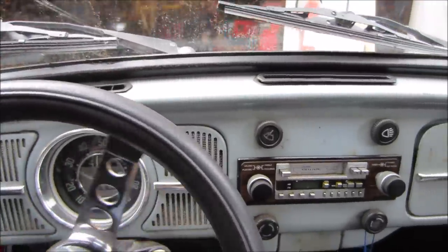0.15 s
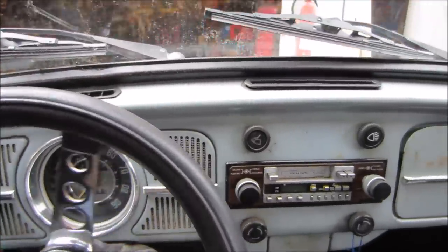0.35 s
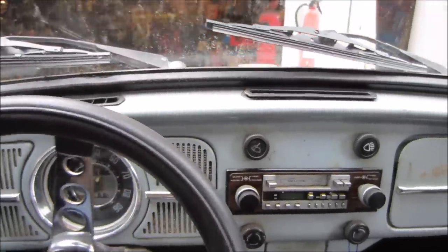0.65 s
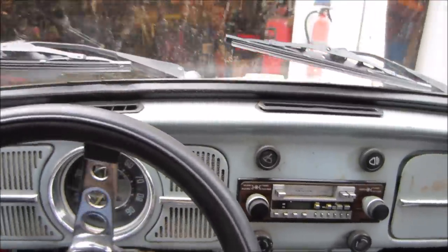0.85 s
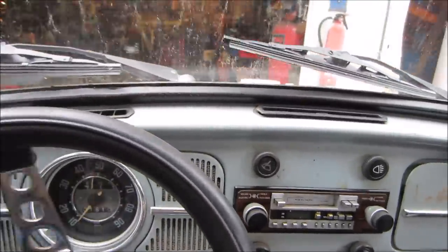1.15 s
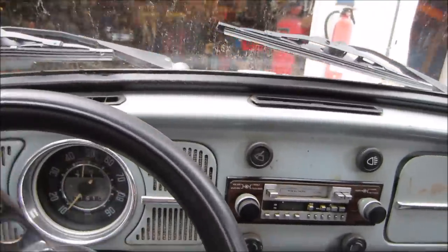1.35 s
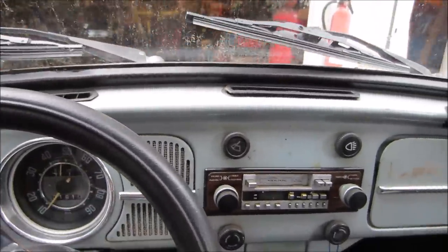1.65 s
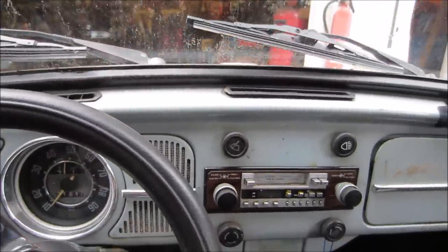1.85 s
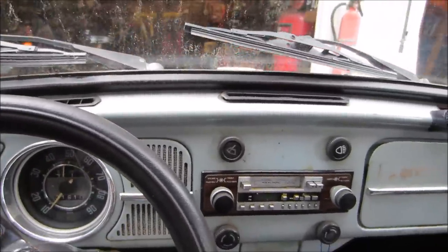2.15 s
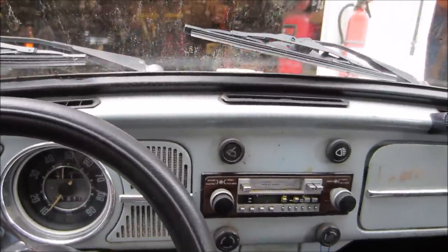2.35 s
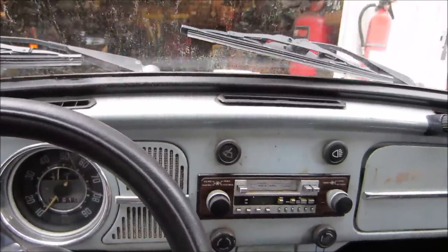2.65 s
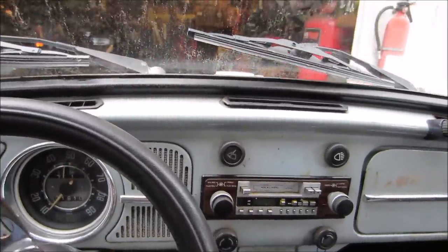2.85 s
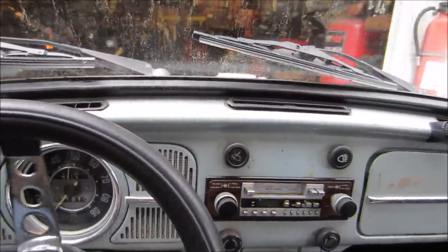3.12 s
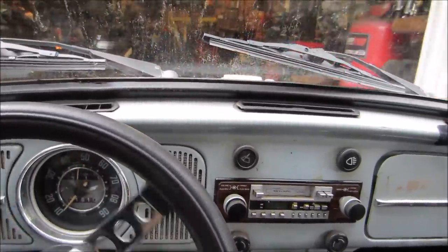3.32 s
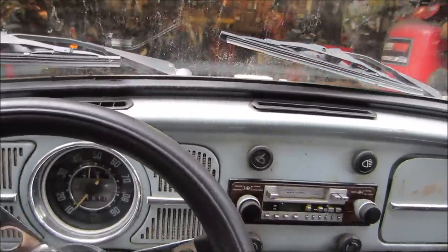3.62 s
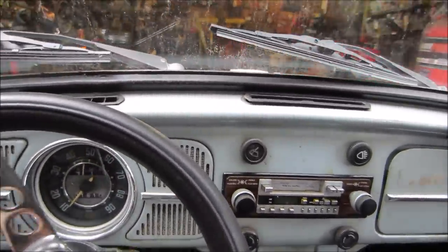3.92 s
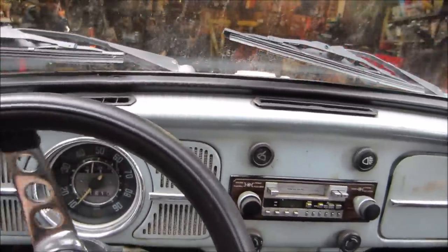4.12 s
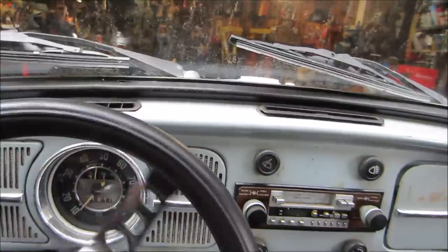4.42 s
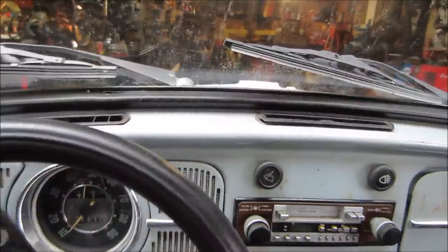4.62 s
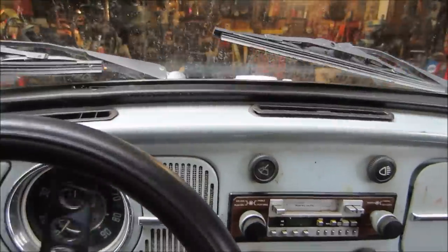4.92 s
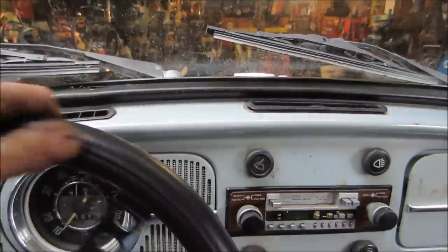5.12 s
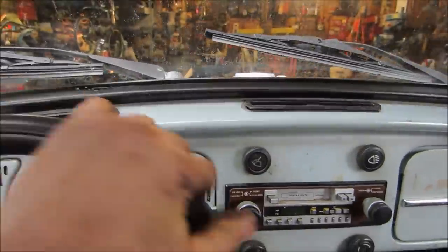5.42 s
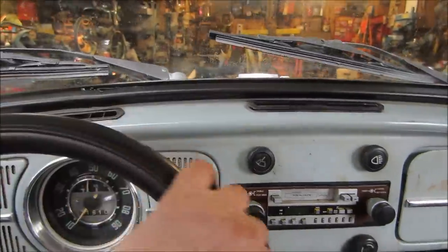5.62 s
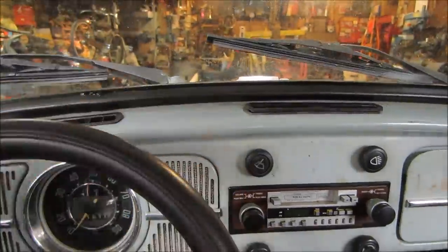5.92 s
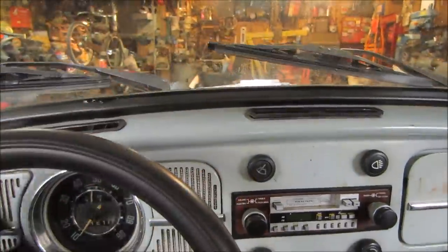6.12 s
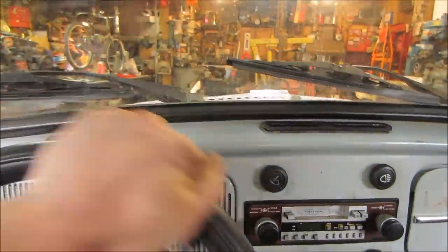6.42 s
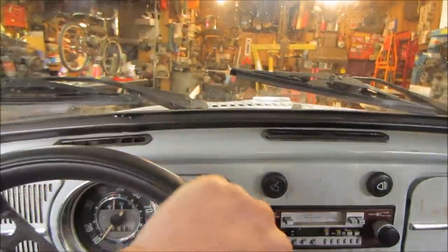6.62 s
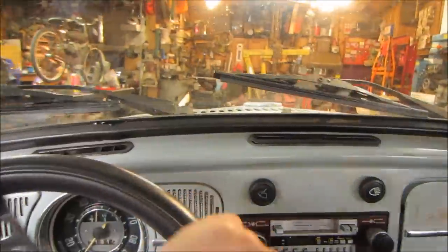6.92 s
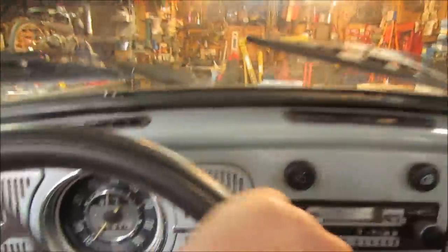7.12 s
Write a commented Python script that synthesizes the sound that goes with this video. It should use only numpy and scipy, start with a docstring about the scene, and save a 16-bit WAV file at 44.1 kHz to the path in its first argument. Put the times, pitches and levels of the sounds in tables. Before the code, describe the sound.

Inside an old small car, an air-cooled four-cylinder engine chugs with a boomy, limping beat. It revs briefly at first, sags to a slow lumpy idle, picks up, then slows again as the car creeps into a workshop, where the rumble grows a little fuller. Clatter, faint hiss and dull road rumble lie beneath. Trim ticks and body knocks appear sparsely; near the end metal bumps, scrapes and squeals briefly. Close cabin microphone.

```python
"""An air-cooled flat-four lopes along just above idle, heard from the cabin as the car creeps into a workshop.
Its firings send pulses and puffs of noise through the resonances of the body shell and tailpipes.
Rocking, crankshaft harmonics and clatter follow the engine speed, over a soft hiss and a road rumble.
Noise bursts make the trim tick and the body knock; at the end rasping noise and ringing tones make
something metal bump, scrape and squeal."""
import sys
import numpy as np
from scipy import signal
from scipy.fft import rfft, irfft, next_fast_len
from scipy.io import wavfile
from scipy.ndimage import uniform_filter1d

SR = 44100
rng = np.random.default_rng(int(sys.argv[2]) if len(sys.argv) > 2 else 0)


def inscribe(sig):
    """Save sig as 16-bit PCM at rate SR to the path in sys.argv[1].

    A 1-D sig is mono; a 2-D sig holds one channel per row.
    Samples are clipped to [-1, 1] before scaling.
    """
    pcm = np.round(np.clip(np.atleast_2d(sig).T, -1, 1) * 32767)
    wavfile.write(sys.argv[1], SR, pcm.astype(np.int16))


N = 320166
T = np.arange(N) / SR  # time of each sample, s

# Speed of the crankshaft. Each row: time in seconds, speed in rpm.
ENGINE_SPEED = [(0, 1000), (.12, 1200), (.24, 1240), (.48, 827), (.8, 974), (1.05, 640), (1.5, 575),
                (1.72, 876), (1.98, 850), (2.42, 1000), (3.05, 860), (3.7, 787), (3.95, 681), (4.75, 628),
                (4.92, 704), (5.35, 608), (5.75, 685), (7, 807), (7.26, 802)]
IDLE_RPM = 800
# The foot eases off the throttle or dabs it. Each row: middle in seconds, half length in seconds, change in dB.
PEDAL_TOUCHES = [(0.352, 0.19, -2.5), (0.972, 0.073, -5), (1.175, 0.055, -6), (1.698, 0.076, 2),
                 (4.349, 0.42, 1.5), (4.815, 0.14, -3.5), (4.97, 0.23, 2), (5.172, 0.023, -3.5)]
DOOR_S, ENTERING_S = 4.44, 1  # when the car passes into the workshop, and how gradually, s
FULL_PULL = 0.52  # speeding up by this many octaves a second counts as pulling hard
RAGGED_IDLE, RAGGED_PER_OCTAVE = .1, -.8  # combustion grows uneven as the speed drops

# How each layer's level follows the driving, before any trim. Each holds: dB at idle, dB per octave of speed,
# dB at full pull, dB gained indoors, share of the pedal's changes.
BOOM_LAW = (-19.5, 8.5, 1.15, 1.53, 1.87)
PIPE_LAW = (-28, -3, 1, 3.5, 1.86)
SHAKE_LAW = (-25.5, -2.5, -0.4, 5, 0.5)
GROWL_LAW = (-44.5, 13, 2.5, -4, 1)
CLATTER_LAW = (-38.5, 5, -0.24, 2.5, 0.22)
ROAD_LAW = (-31, -3, 0.1, 4, 0.9)

# Exhaust of each cylinder, in firing order. Each row: relative strength in dB, delay in the manifold in seconds,
# strength of the echo in the silencer as a share of the pulse.
CYLINDERS = [(-4.5, 0.00305, 0.74), (0, 0.00437, 0.38), (-1.4, 0.0024, 0.93), (1, 0.00576, 0.079)]
# Single firings that get their own strength. Each row: time in seconds, extra dB.
HARD_FIRINGS = [(.48, 15.5), (.61, 6), (1.32, -2.5), (1.54, 5), (1.62, -4.5), (1.68, 0), (1.89, 12),
                (2.03, 6), (4.07, 2), (4.62, 2), (4.92, 10), (4.98, 0), (5.35, 7), (6.47, 5), (6.85, 2.5),
                (7.0, 1), (7.15, -0.5)]
# How sharply the exhaust valves bark. Each row: time in seconds, tilt in dB per octave.
BARK_SHARPNESS = [(0, 6), (.8, -2), (1.4, 0.5), (1.68, 5), (2.3, -2.5), (3.6, -3), (4.95, 7), (5.3, 2),
                  (5.9, 7), (7.26, 6.5)]
# Resonances of the body shell. Each row: pitch in Hz, width in Hz, relative level in dB.
SHELL_MODES = [(126.35, 29.6, 2.5), (165.1, 22.7, -2), (181.8, 20, -16), (197, 12.5, -13.5),
               (237.4, 21.5, -17.5), (270.3, 27, -20.5), (336, 19, -29.5), (367.7, 8.1, -27.5),
               (482.3, 60, -39)]
FIRST_DB, FIRST_PULL_DB = 12, -3  # the first cylinder stands out, less so under pull
THIRD_DB, THIRD_PULL_DB = 0.5, 6.5  # the third joins it under pull
GAS, JITTER_S = .55, .0014  # gas noise and timing scatter of fully ragged firings

# Firings as the tailpipes give them, in firing order. Each row: relative strength in dB, delay in seconds.
PIPE_FIRINGS = [(0, 0.00025), (6, 0.0075), (-2, 0.002), (0.5, 0.0056)]
# Low resonances of the tailpipes. Each row: pitch in Hz, width in Hz, relative level in dB.
PIPE_MODES = [(46.4, 11, -1), (70.6, 15, 9), (85.15, 11.5, 5)]
PIPE_SCATTER_DB, PIPE_JITTER_S = 4, .0015  # scatter of pulse strength and timing in ragged firings
ROCK_LOPE, WAVER_DB = .5, 1.2  # extra rocking on the first cylinder, wavering of the body shake

# Level of a crankshaft harmonic at the pitch it has reached. Each row: pitch in Hz, relative level in dB.
GROWL_LEVEL = [(52, 2), (66, 13), (80, 14), (98, 7), (125, -4), (160, 1), (195, -1), (215, -6), (243, 2),
               (265, -4), (290, -3), (315, -14), (370, -18), (460, -25)]
# Colour of the clatter. Each row: pitch in Hz, relative level in dB per Hz.
CLATTER_COLOUR = [(150, -1), (330, 5.5), (410, 0), (500, 4.5), (580, -1.5), (720, -4), (810, -4),
                  (1000, -5), (1270, -13), (1450, -11.5), (2100, -17), (2900, -23.5), (3800, -33),
                  (6000, -75)]
CLATTER_SWELL = 0.48  # the clatter swells by this share of the hiss's swells

# Bumps of the metal as it is dragged. Each row: time in seconds, level in dB, decay time in seconds,
# tilt in dB per octave.
METAL_BUMPS = [(6.941, -34.5, 0.071, 0.5), (6.951, -32, 0.05, -2), (6.981, -30, .05, -9),
               (7.018, -28, 0.066, -7), (7.137, -39.5, 0.15, -4)]
# Colour of the bumps before the tilt. Each row: pitch in Hz, relative level in dB per Hz.
BUMP_COLOUR = [(200, -12.5), (900, 2), (1500, 6.5), (2200, -2), (3200, -2), (3900, -6.5), (5000, -9),
               (5800, -15), (7000, -9.5), (7700, -23.5), (11000, -49)]
# Strokes of the metal scrape. Each row: start in seconds, length in seconds, pressure in dB.
SCRAPE_STROKES = [(6.98, .04, -32), (7.01, .062, -28), (7.06, .1, -29.5), (7.15, .06, -38)]
# Colour of the scrape. Each row: pitch in Hz, relative level in dB per Hz.
SCRAPE_COLOUR = [(250, 7), (500, 2.5), (850, 5), (1400, 2.5), (2200, 1), (3200, -7), (4300, -15.5),
                 (5500, -22), (7300, -24), (9000, -49), (12000, -58)]
SLIDE_OFF_S = 0.014  # how long the rasp lingers as the pressure eases
# Resonances of the metal that the slips catch. Each row: middle in seconds, half length in seconds, pitch in Hz,
# width in Hz, glide in octaves per second, level in dB.
METAL_SQUEALS = [(6.988, .012, 850, 30, .3, -33), (7.018, .012, 770, 70, 1.5, -30),
                 (7.03, .017, 2100, 45, -.15, -32), (7.04, .02, 5100, 150, 0, -52),
                 (7.115, .035, 1420, 50, .2, -37), (7.125, .025, 2220, 130, -.4, -40),
                 (7.132, .01, 1060, 90, 1, -35), (7.13, .028, 5870, 50, 0, -44),
                 (7.135, .015, 7130, 70, 0, -53), (7.14, .05, 3248, 16, 0, -42.5),
                 (7.15, .015, 5160, 90, 0, -51), (7.165, .014, 2998, 28, 0, -38),
                 (7.16, .03, 6487, 10, 0, -52), (7.176, .008, 7386, 25, 0, -55)]
CATCH_WIDTH_HZ = 250  # how far from its resonance a catch spreads

# Ticks of the trim, and the dull upper part of the body knock at 3.62 s. Each row: time in seconds, level in
# dB, decay time in seconds, tilt in dB per octave.
CABIN_TICKS = [(.086, -41.5, 0.072, 10), (.094, -37, 0.06, 0), (1.008, -29.5, 0.033, -2.5),
               (3.624, -30.5, .14, -8), (4.284, -32, 0.047, -1.5), (4.715, -41, .06, -2)]
# Colour of the ticks before the tilt. Each row: pitch in Hz, relative level in dB per Hz.
TICK_COLOUR = [(200, -6), (600, 1), (1100, 3), (1350, 7), (1600, 7), (1900, 1), (2550, 5), (3300, -4),
               (4300, -7), (6000, -9), (8500, -17), (10000, -23), (12000, -50)]
CRACK_S = .002  # each contact opens with a crack this brief
TICK_TAIL_DB, BUMP_TAIL_DB = -3, 1  # start of the noisy tail, relative to the crack
# Hollow knocks in the body. Each row: time in seconds, level in dB.
BODY_KNOCKS = [(3.623, -33), (3.653, -31), (4.922, -27.5)]
# Resonances of the knocked panel. Each row: pitch in Hz, width in Hz, relative level in dB.
PANEL_MODES = [(340, 24, -5), (491, 16, 17.5), (602, 35, -4), (760, 65, -10.5), (1130, 120, -16)]

# Level of the hiss before its trim. Each row: time in seconds, level in dB.
HISS_LEVEL = [(0, -58), (.17, -60), (.33, -68), (.5, -68), (.7, -62), (.96, -69), (1.29, -60.5),
              (1.52, -66), (1.66, -58), (1.88, -65), (2.4, -61), (2.8, -65), (3.2, -66), (3.38, -60.5),
              (3.7, -67), (3.9, -63), (4.35, -62.5), (4.8, -67), (4.97, -62.5), (5.2, -67), (5.85, -62),
              (5.98, -65), (6.12, -61), (6.4, -63.5), (7.26, -61)]
# Colour of the hiss. Each row: pitch in Hz, relative level in dB per Hz.
HISS_COLOUR = [(1000, -22.5), (3000, 0.5), (4200, 1.5), (5200, 4.5), (7000, 2.5), (8500, -0.5), (10000, -6),
               (11500, -19), (13000, -16), (15500, -20.5)]
# Colour of the road rumble before its low-pass. Each row: pitch in Hz, relative level in dB per Hz.
ROAD_COLOUR = [(15, -13.5), (32, -7.5), (45, -0.5), (100, 0.5), (150, 4.5), (250, -13), (420, -36.5),
               (900, -82.5)]
EDGE_HZ = 15750  # upper limit of the sound


def exhaust(firings, boom_db, scatter_db=8.5, echo_s=0.01619, lead_s=0.01222):
    """Loping beats: each firing sends a pulse, its echo and a puff of gas into the body shell."""
    first_db, third_db = lope()
    sharp_db = curves(BARK_SHARPNESS)[0]
    at, cylinder, chance = sparks(firings)
    db, delay, echo = np.array(CYLINDERS)[cylinder].T
    db = db + first_db[at] * (cylinder == 0) + third_db[at] * (cylinder == 2)
    db = db + scatter_db * chance[:, 0]
    for s, extra_db in HARD_FIRINGS:
        db[np.argmin(abs(T[at] - s))] += extra_db  # the nearest firing
    start = T[at] - lead_s + delay + JITTER_S * chance[:, 1]
    echo_start = start + echo_s + JITTER_S * chance[:, 2]
    pulses = train(start, amp(db)) + train(echo_start, echo * amp(db))
    # each puff is noise that dies away over 12 ms
    puff_shape = signal.lfilter([1], [1, -np.exp(-1 / (.012 * SR))], pulses)
    puffs = puff_shape * rng.standard_normal(N)
    drive = evened(pulses) + GAS * ragged() * evened(puffs)
    boom = np.zeros(N)
    for hz, width, mode_db in SHELL_MODES:
        # sharper pulses reach the higher resonances more strongly
        bark_db = sharp_db * np.log2(hz / SHELL_MODES[0][0])
        boom += swelling(drive * amp(mode_db + bark_db), hz, width)
    return amp(boom_db) * steadied(boom, size=12000)


def tailpipes(firings, pipe_db, trim_db=1.5):
    """A low burble: delayed pulses of uneven strength build up in the pipes' resonances."""
    at, cylinder, chance = sparks(firings)
    db, delay = np.array(PIPE_FIRINGS)[cylinder].T
    times = T[at] + delay + PIPE_JITTER_S * chance[:, 1]
    pulses = train(times, amp(db + PIPE_SCATTER_DB * chance[:, 0]))
    burble = sum(amp(mode_db) * swelling(pulses, hz, width) for hz, width, mode_db in PIPE_MODES)
    return amp(pipe_db + trim_db) * steadied(burble, size=9000)


def shake(firings, shake_db, trim_db=-2.5):
    """The engine rocks the whole shell once per firing, harder on the first cylinder."""
    lopsided = 1 + ROCK_LOPE * np.cos(2 * np.pi * firings / 4)
    rocking = np.sin(2 * np.pi * firings) * lopsided
    return amp(shake_db + trim_db + WAVER_DB * wander(14)) * evened(rocking)


def growl(firings, growl_db, waver_db=2.0, count=19):
    """Clean harmonics of the crankshaft, which swell as the engine speeds up and pulls."""
    crank_hz = curves(ENGINE_SPEED)[0] / 60
    hz, db = np.transpose(GROWL_LEVEL)
    orders = np.zeros(N)
    for k in range(4, 4 + count):
        order_db = np.interp(k * crank_hz, hz, db) + waver_db * wander(6)
        # two firings per turn, so the crank's phase is pi times the firings
        orders += amp(order_db) * np.sin(np.pi * k * firings + 2 * np.pi * rng.random())
    return amp(growl_db) * np.sqrt(2) * orders


def clatter(firings, clatter_db, trim_db=0.23, beat=0.67, tap_fade=1.0):
    """Fan rush and tappets: slightly gritty noise that flares twice per firing."""
    since_tap = 2 * firings % 1  # share of the gap between taps
    gate = 1 + beat * np.exp(-since_tap / tap_fade) * amp(3 * wander(45))
    noise = gate * (rng.standard_normal(N) + .4 * grains(1500, 2.5))
    return amp(clatter_db + trim_db) * evened(coloured(noise, CLATTER_COLOUR))


def scrape(trim_db=-1.8):
    """Juddering slips rasp over a metal sheet: gritty noise that follows the pressure."""
    judder = amp(2 * wander(220))
    slips = evened(rng.standard_normal(N) + .8 * grains(1200, 2.5)) * judder
    return amp(trim_db) * pressing() * evened(coloured(slips, SCRAPE_COLOUR))


def pressing():
    """Pressure of the scrape: each stroke is a broad arch with a short tail."""
    power = np.zeros(N)
    for s, length, db in SCRAPE_STROKES:
        power += amp(db) ** 2 * np.sin(np.pi * np.clip((T - s) / length, 0, 1))
    keep = np.exp(-1 / (SLIDE_OFF_S * SR))
    return signal.lfilter([1 - keep], [1, -keep], np.sqrt(abs(power)))


def squeals():
    """Resonances of the metal swell as the slips catch them, slide with the contact point, then ring out."""
    out = np.zeros(N)
    t = T[:SR // 2] - .2  # time around the middle of the catch
    for s, half, hz, width, glide, db in METAL_SQUEALS:
        noise = rng.standard_normal(len(t)) + 1j * rng.standard_normal(len(t))
        catch = np.exp(-(t / half) ** 2 / 2) * noise
        poles = np.exp(-np.pi * np.array([width, CATCH_WIDTH_HZ]) / SR)
        swing = signal.lfilter([1], np.poly(poles), catch)
        turns = np.cumsum(hz * 2 ** (glide * t)) / SR
        ring = (swing * np.exp(2j * np.pi * turns)).real
        loudest = np.sqrt(uniform_filter1d(ring ** 2, size=500).max())
        part = out[round((s + t[0]) * SR):][:len(t)]
        part += amp(db) * ring[:len(part)] / loudest
    return out


def contacts(rows, colour, tail_db):
    """Dry hits: a crack and a short noisy tail in the colour of the struck part."""
    out = np.zeros(N)
    t = T[:SR // 4] - .01
    age = np.maximum(t, 0)
    for s, db, t60, tilt_db in rows:
        crack = np.exp(-(age / CRACK_S) ** 2)
        tail = amp(tail_db - 60 * age / t60)  # falls 60 dB per decay time
        strike = (t >= 0) * np.maximum(crack, tail)
        noise = coloured(strike * rng.standard_normal(len(t)), colour, tilt_db)
        burst = evened(noise) * np.sqrt(np.mean(strike ** 2))
        part = out[round((s + t[0]) * SR):][:len(t)]
        part += amp(db) * burst[:len(part)]
    return out


def knocks(t60=0.051):
    """A short rattling blow, falling 60 dB in t60 seconds, rings a hollow panel."""
    out = np.zeros(N)
    for s, db in BODY_KNOCKS:
        fade = (T >= s) * amp(-60 * np.clip(T - s, 0, 1) / t60)
        ring = ringing(rng.standard_normal(N) * fade, PANEL_MODES)
        loudest = np.sqrt(uniform_filter1d(ring ** 2, size=500).max())
        out += amp(db) * ring / loudest
    return out


def hiss(hiss_db, trim_db=2.1, flutter_db=2.36):
    """A soft, slightly crackling hiss: noise and clicks whose level comes and goes."""
    flutter = amp(.5 * wander(60) + flutter_db * wander(16))
    noise = (rng.standard_normal(N) + .3 * grains(250, 2.5)) * flutter
    return amp(hiss_db + trim_db) * evened(coloured(noise, HISS_COLOUR))


def road(road_db):
    """Dull rumble of tyres and panels: noise kept to the low pitches."""
    low_pass = signal.butter(4, 420, fs=SR, output="sos")
    noise = signal.sosfilt(low_pass, coloured(rng.standard_normal(N), ROAD_COLOUR))
    return amp(road_db) * evened(noise)


def sparks(firings):
    """Sample index and cylinder of each firing, with chance as large as the combustion is ragged."""
    at = np.flatnonzero(np.diff(np.floor(firings), prepend=0))
    cylinder = np.floor(firings[at]).astype(int) % 4
    return at, cylinder, ragged()[at, None] * rng.standard_normal((len(at), 3))


def revs():
    """Engine speed in octaves above idle."""
    return np.log2(curves(ENGINE_SPEED)[0] / IDLE_RPM)


def pull():
    """From -1 while the engine runs down to 1 while it speeds up hard."""
    octaves_per_s = uniform_filter1d(np.gradient(revs()) * SR, size=6000)
    return np.tanh(octaves_per_s / FULL_PULL)


def ragged():
    """Unevenness of the combustion, from .06 to 1, growing as the engine slows."""
    return np.clip(RAGGED_IDLE + RAGGED_PER_OCTAVE * revs(), .06, 1)


def lope():
    """Extra dB of the first and third cylinders, set by the pull."""
    load = np.maximum(pull(), 0)
    return FIRST_DB + FIRST_PULL_DB * load, THIRD_DB + THIRD_PULL_DB * load


def level(law):
    """Level in dB, moved by speed, pull, the workshop's walls and each touch of the pedal."""
    idle_db, speed_db, pull_db, indoor_db, pedal_share = law
    indoors = .5 + .5 * np.tanh((T - DOOR_S) / ENTERING_S)
    pedal_db = sum(db * np.exp(-((T - s) / half) ** 2) for s, half, db in PEDAL_TOUCHES)
    driving_db = idle_db + speed_db * revs() + pull_db * pull()
    return driving_db + indoor_db * indoors + pedal_share * pedal_db


def swelling(x, hz, width):
    """Two coupled resonators: a tone that builds up and dies, with steep flanks."""
    t = T[:SR // 3]
    envelope = width ** 2 * t * np.exp(-np.pi * width * t)
    return signal.oaconvolve(x, envelope * np.sin(2 * np.pi * hz * t))[:N]


def ringing(x, modes):
    """Passes x through damped modes; neighbours swing in opposite directions."""
    t = T[:SR // 2]
    ring = np.zeros(len(t))
    for k, (hz, width, db) in enumerate(modes):
        decay = width * np.exp(-np.pi * width * t)
        ring += (-1) ** k * amp(db) * decay * np.sin(2 * np.pi * hz * t)
    return signal.oaconvolve(x, ring)[:N]


def train(times, sizes):
    """Single-sample pulses at the given times."""
    return np.bincount(np.clip(times * SR, 0, N - 1).astype(int), sizes, N)


def grains(per_s, spread_db):
    """Random clicks of very unequal size, about per_s a second."""
    size = amp(spread_db * np.minimum(rng.exponential(1, N), 4))
    return evened(rng.standard_normal(N) * size * (rng.random(N) < per_s / SR))


def wander(per_s):
    """Smooth chance of rms 1: random points, per_s a second, joined by straight lines."""
    return evened(np.interp(T * per_s, np.arange(4000), rng.standard_normal(4000)))


def coloured(x, spectrum, tilt_db=0):
    """Shapes x by a short spectrum, tilted per octave."""
    size = next_fast_len(len(x))
    octave = np.log2(np.fft.rfftfreq(size, 1 / SR) + 1)
    hz, db = np.transpose(spectrum)
    tilted_db = db + tilt_db * np.log2(hz / hz[0])
    gain = amp(np.interp(octave, np.log2(hz), tilted_db))
    return irfft(rfft(x, size) * gain, size)[:len(x)]


def curves(table):
    """Each column of a table after the first, joined by straight lines in time."""
    s, *columns = np.transpose(table)
    return [np.interp(T, s, c) for c in columns]


def steadied(x, size):
    """Evens out the level of x to about rms 1 over stretches of size samples."""
    power = uniform_filter1d(uniform_filter1d(x ** 2, size), size)
    return x / np.sqrt(abs(power) + 1e-20)


def evened(x):
    """Scales to rms 1."""
    return x / np.sqrt(np.mean(x ** 2) + 1e-20)


def amp(db):
    """Decibels to gain."""
    return 10 ** (np.asarray(db) / 20)


def scene():
    """Crank speed times every engine sound, two firings per turn; then come metal, cabin and road."""
    firings = .79 + np.cumsum(2 * curves(ENGINE_SPEED)[0] / 60) / SR  # running count
    hiss_db = curves(HISS_LEVEL)[0]
    clatter_db = level(CLATTER_LAW) + CLATTER_SWELL * (hiss_db - hiss_db.mean())
    engine = exhaust(firings, level(BOOM_LAW)) + tailpipes(firings, level(PIPE_LAW))
    engine = engine + shake(firings, level(SHAKE_LAW)) + growl(firings, level(GROWL_LAW))
    engine = engine + clatter(firings, clatter_db)
    metal = contacts(METAL_BUMPS, BUMP_COLOUR, BUMP_TAIL_DB) + scrape() + squeals()
    cabin = contacts(CABIN_TICKS, TICK_COLOUR, TICK_TAIL_DB) + knocks()
    background = hiss(hiss_db) + road(level(ROAD_LAW))
    return (engine + metal + cabin + background)[None]


def record(dry):
    """The microphone loses the deepest rumble; then everything above the upper limit is cut."""
    high_pass = signal.butter(2, 15, "high", fs=SR, output="sos")
    lean = signal.sosfilt(high_pass, dry)
    low_pass = signal.firwin(511, EDGE_HZ, window=("kaiser", 9), fs=SR)
    return signal.oaconvolve(lean, low_pass[None], "same")


dry = scene()
out = record(dry)
inscribe(out)
```